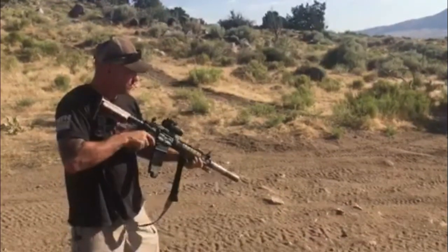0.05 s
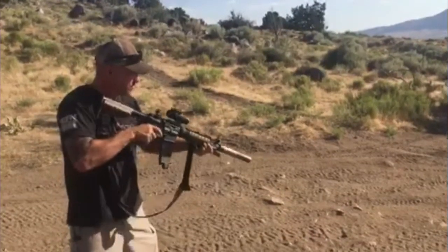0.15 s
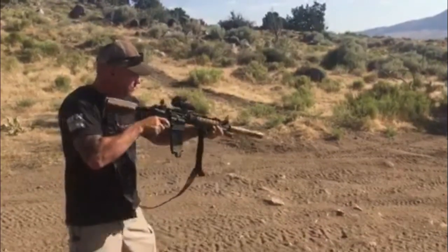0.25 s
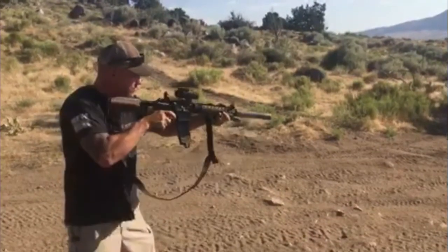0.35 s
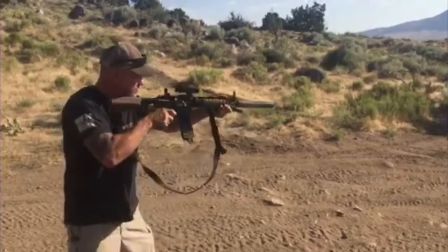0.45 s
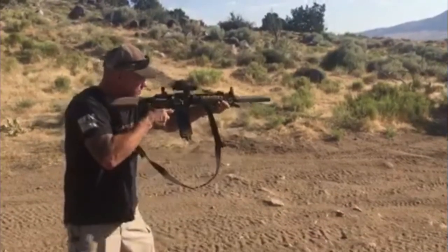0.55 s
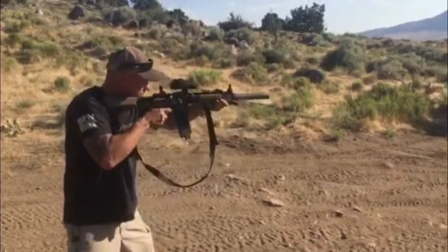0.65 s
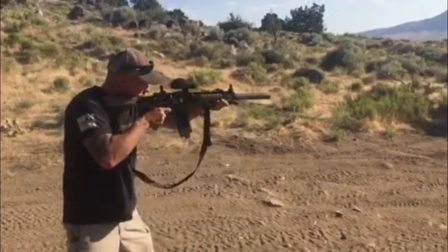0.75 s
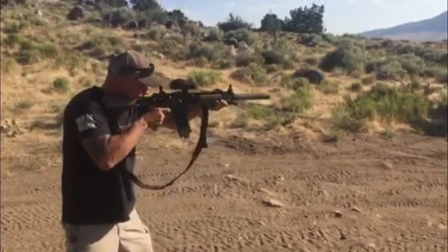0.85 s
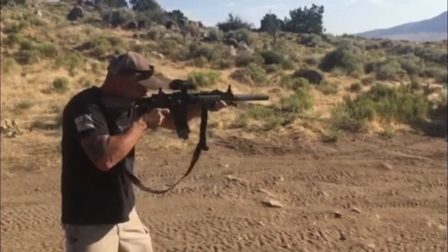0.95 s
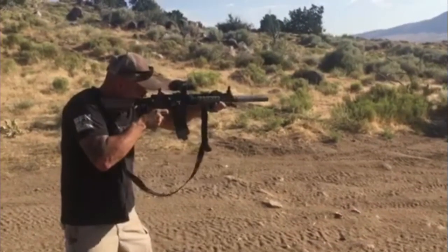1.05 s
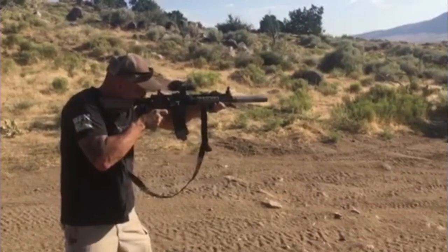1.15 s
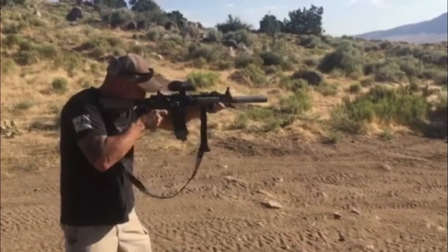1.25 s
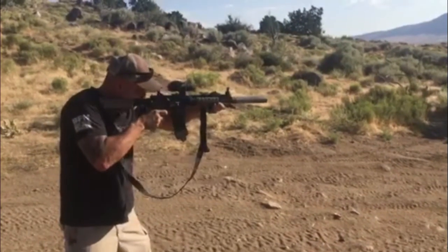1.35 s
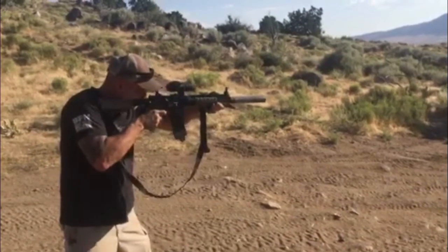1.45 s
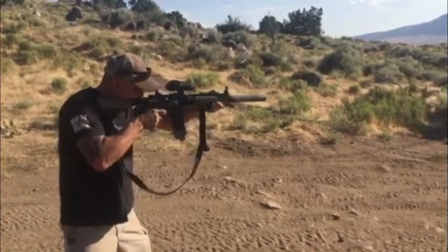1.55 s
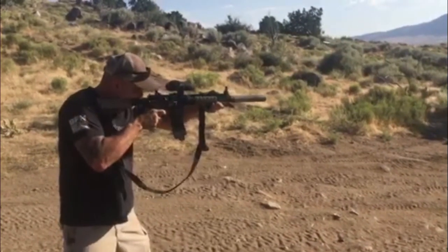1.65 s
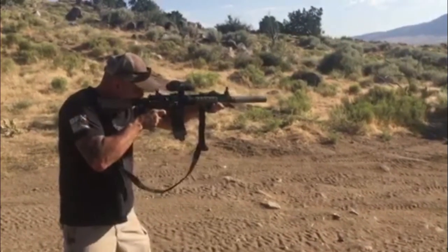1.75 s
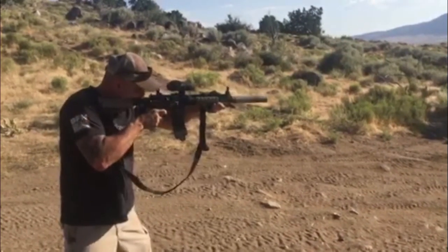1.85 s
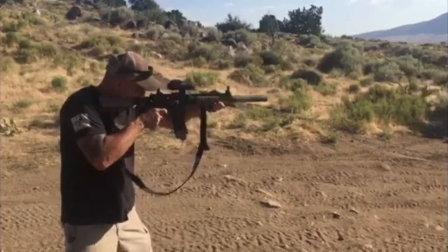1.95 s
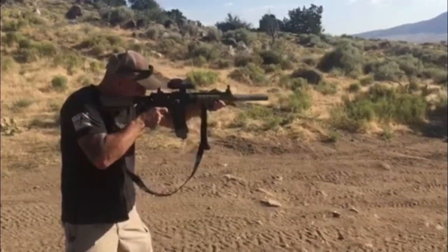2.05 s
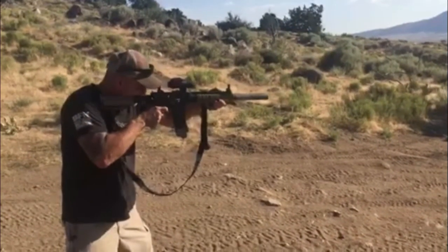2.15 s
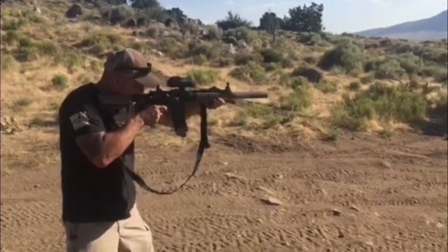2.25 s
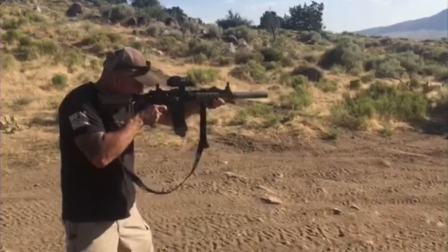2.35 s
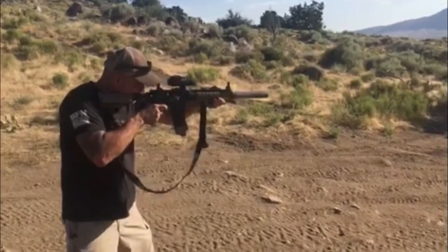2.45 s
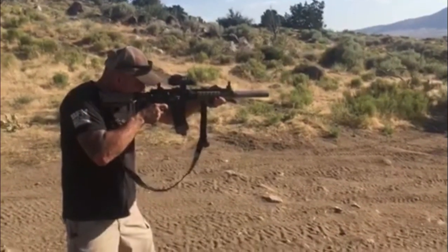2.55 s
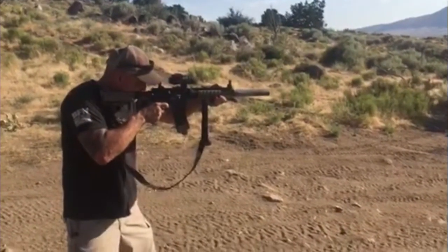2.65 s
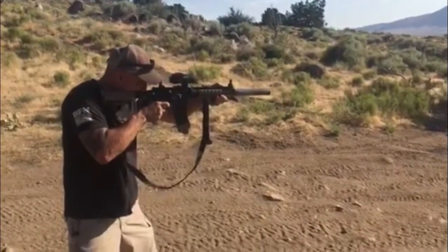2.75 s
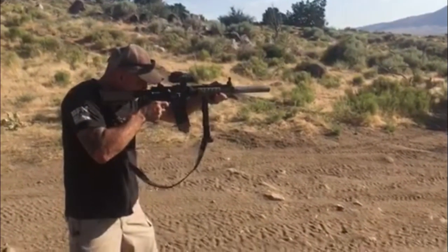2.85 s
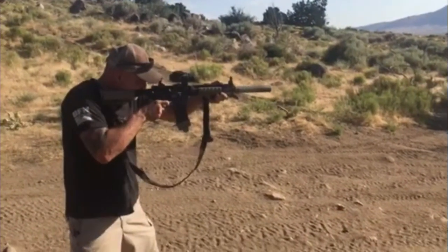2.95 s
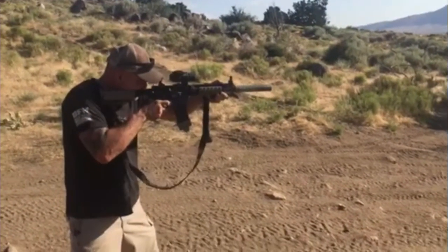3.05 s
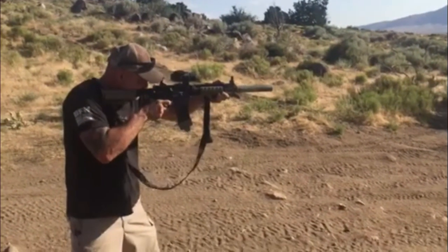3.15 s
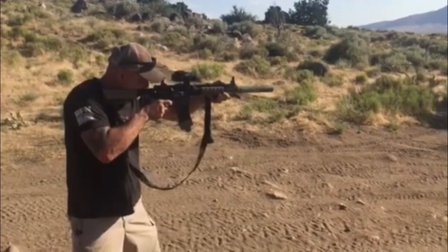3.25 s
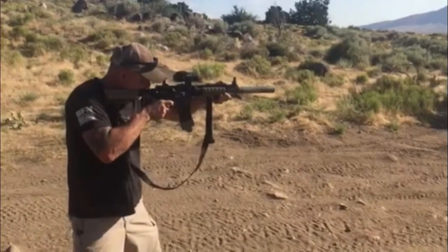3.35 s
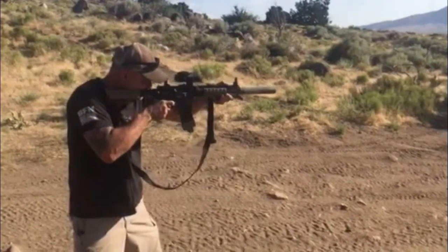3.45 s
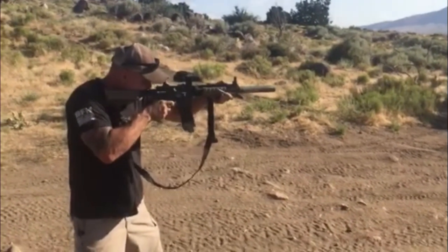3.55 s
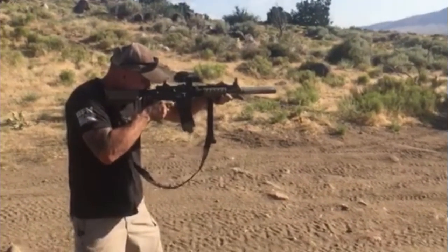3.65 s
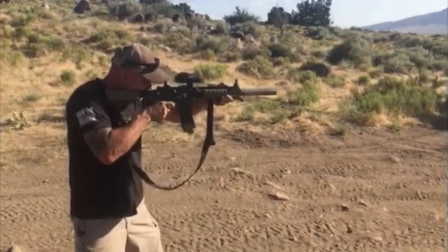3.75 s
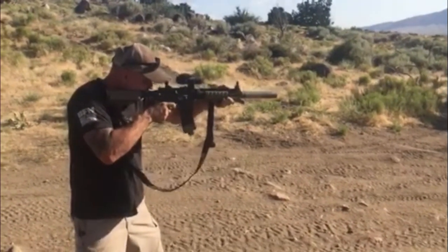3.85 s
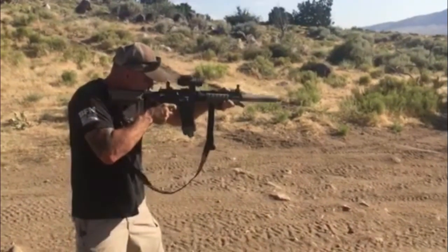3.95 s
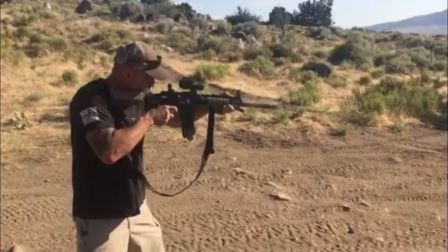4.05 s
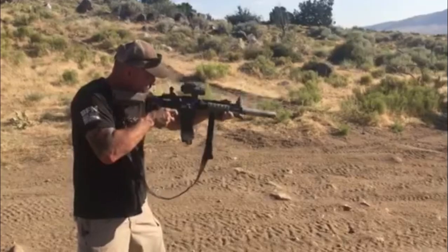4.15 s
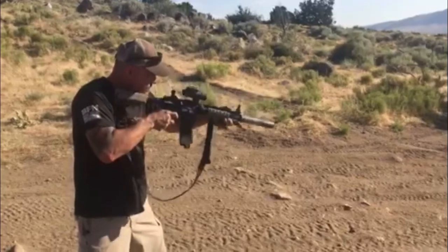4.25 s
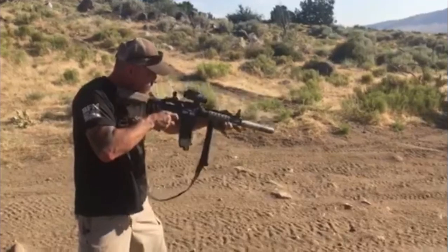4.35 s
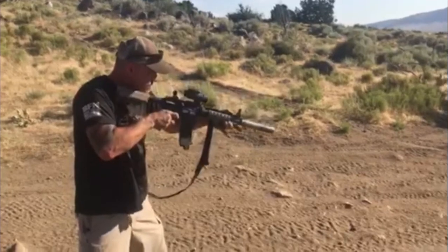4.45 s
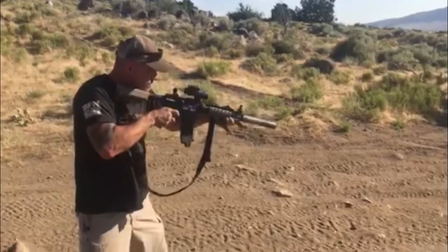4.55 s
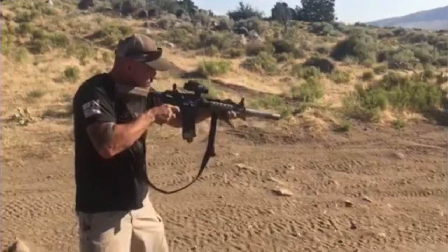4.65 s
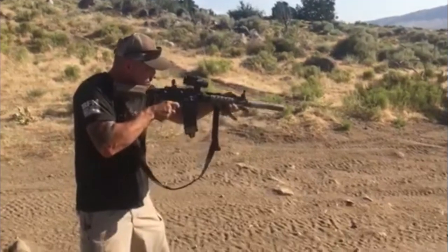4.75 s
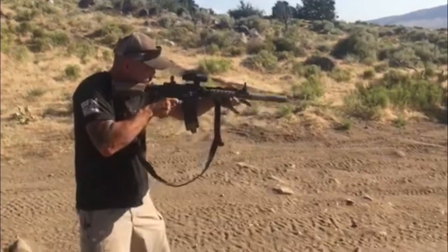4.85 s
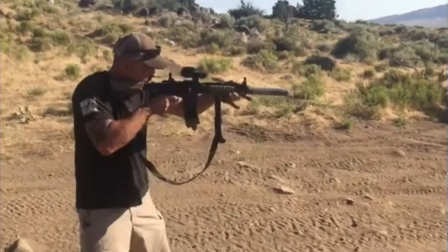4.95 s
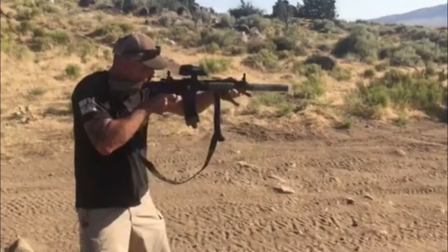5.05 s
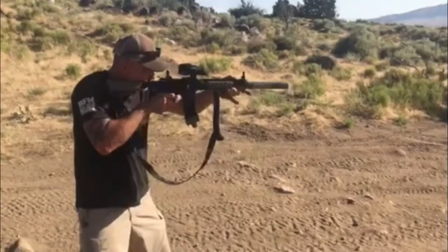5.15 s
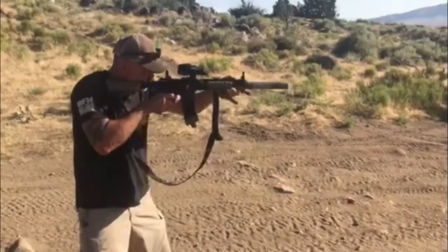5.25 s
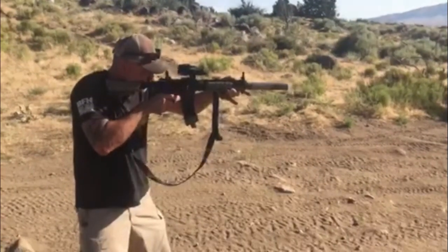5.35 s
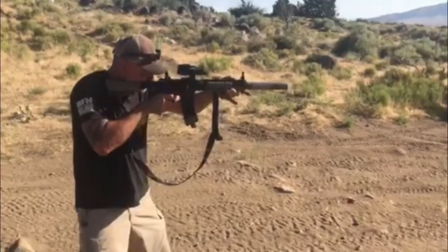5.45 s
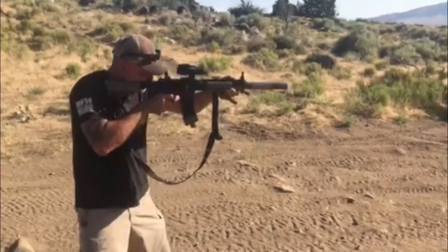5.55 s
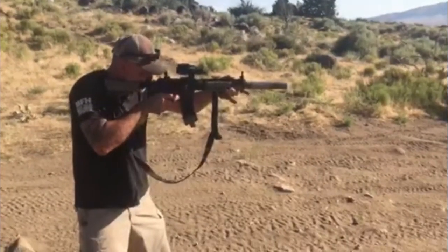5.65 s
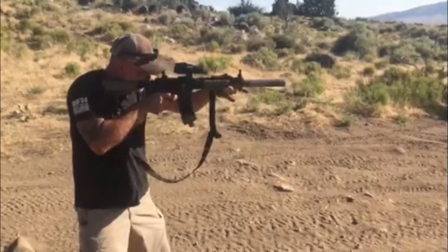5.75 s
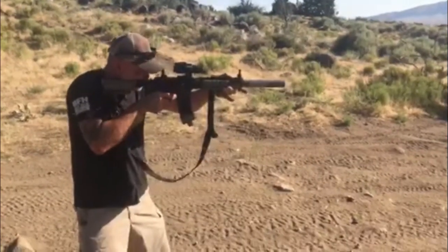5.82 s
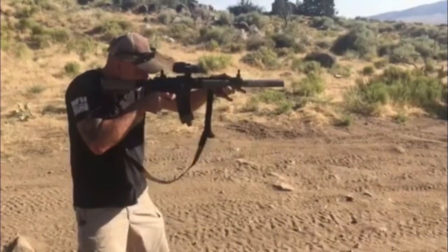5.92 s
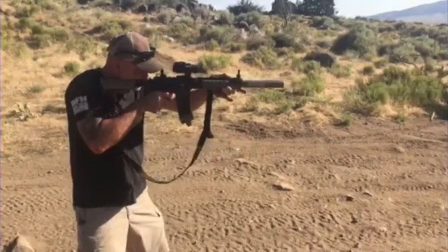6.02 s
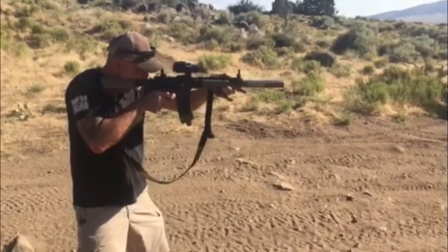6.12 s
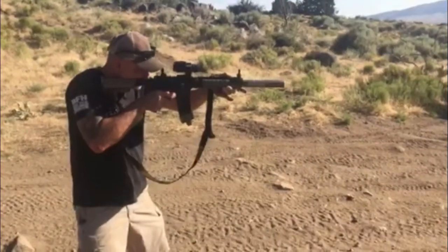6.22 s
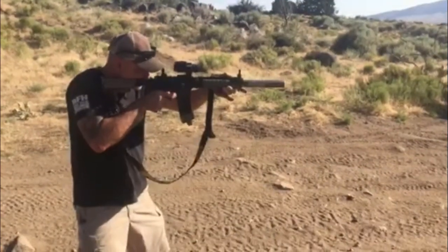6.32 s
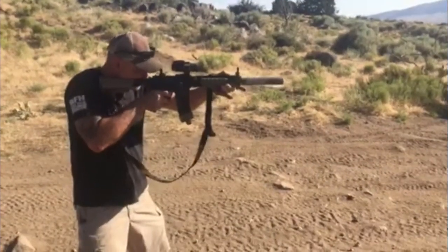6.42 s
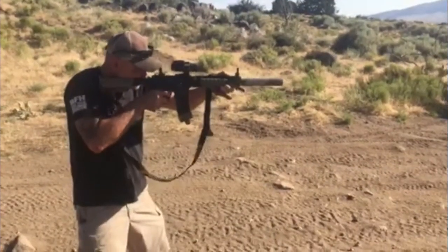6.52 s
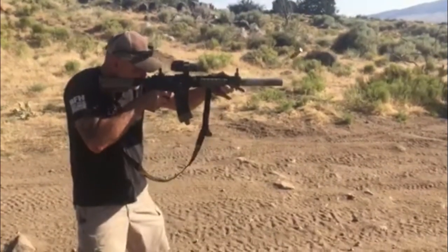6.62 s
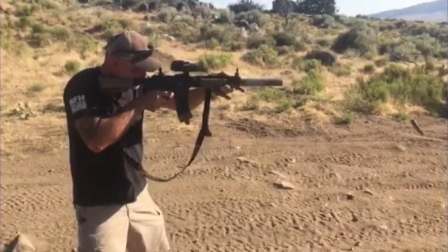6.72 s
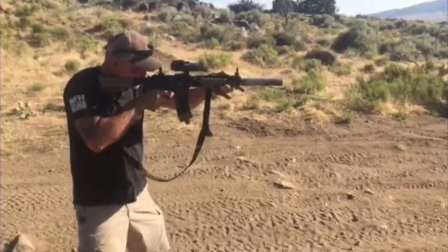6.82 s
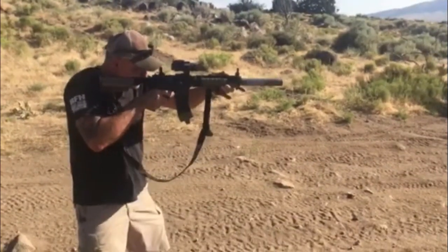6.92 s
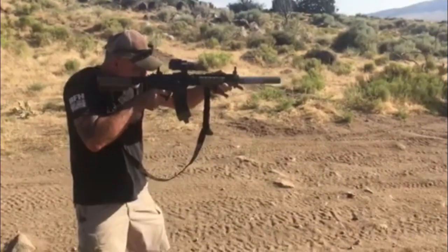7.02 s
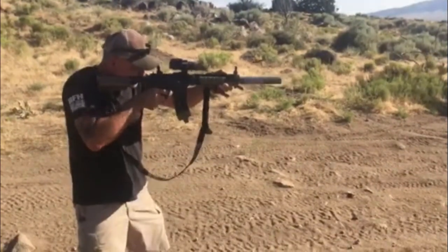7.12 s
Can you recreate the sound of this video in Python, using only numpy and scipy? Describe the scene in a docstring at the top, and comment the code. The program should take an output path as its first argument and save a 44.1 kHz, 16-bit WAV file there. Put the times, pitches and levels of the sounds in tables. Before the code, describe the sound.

A suppressed carbine cracks close to the microphone, clipping it, in two strings of single shots: four, a gap of about two seconds, then three. The bolt snaps shut with every shot, and a scrubby hillside throws back a short, grainy echo. A metal click comes before the firing, with lighter trigger and sling ticks later. Near the end a more distant gun adds one duller, rolling shot. The open air is otherwise nearly silent.

```python
"""On a dirt range, a suppressed carbine fires seven single shots a few metres from a phone that overloads.
Each shot is a brief swell, a blast of gas with a low thump, then the steel bolt slamming home.
Dirt banks, a scrubby hillside and rock faces throw the sound back. The safety, sling and trigger click,
spent brass rings, and another gun fires once further off, all over a faint hiss of open air."""
import sys
import numpy as np
from scipy import signal
from scipy.fft import rfft, irfft
from scipy.io import wavfile

SR = 44100
rng = np.random.default_rng(int(sys.argv[2]) if len(sys.argv) > 2 else 0)


def master(y):
    """Save y as 16-bit WAV."""
    cut = np.clip(np.atleast_2d(y).T, -1, 1)
    pcm = np.round(cut * 32767)  # scale
    wavfile.write(sys.argv[1], SR, pcm.astype(np.int16))


N = 316638
SHORT = np.arange(SR // 5) / SR  # 0.2 seconds of time, for quick sounds
LONG = np.arange(3 * SR // 2) / SR  # 1.5 seconds, for sounds that linger


def undb(db):
    """Turn decibels (dB) into a number to multiply by."""
    return 10 ** (np.asarray(db) / 20)


def add(out, s, x):
    """Mix the sound x into out, starting at s seconds."""
    i = int(s * SR)
    out[i:i + len(x)] += x[:max(N - i, 0)]


def fade(t, t60):
    """Die away smoothly, dropping 60 dB in t60 seconds."""
    return np.exp(-np.log(1000) * t / t60)


def bell(centre_s, spread_s):
    """A smooth rise and fall around centre_s."""
    return np.exp(-.5 * ((SHORT - centre_s) / spread_s) ** 2)


def wander(t, step):
    """A random level that glides to a new value every step seconds."""
    knots = np.arange(0, t[-1] + step, step)
    return np.interp(t, knots, rng.standard_normal(len(knots)))


def noise(t, tone):
    """Noise as long as t, of strength 1; the (Hz, dB) rows of tone say how strong each pitch is."""
    hz, db = np.transpose(tone)
    f = np.maximum(np.fft.rfftfreq(len(t), 1 / SR), 1)
    gain = undb(np.interp(np.log(f), np.log(hz), db))
    bass_cut = np.minimum(f / hz[0], 1) ** 2
    shaped = irfft(rfft(rng.standard_normal(len(t))) * gain * bass_cut, len(t))
    return shaped / shaped.std()


def resonate(x, hz, width_hz):
    """Keep the part of x near one pitch, so that it rings."""
    return signal.lfilter(*signal.iirpeak(hz, hz / width_hz, fs=SR), x)


def pitched_noise(hz, width_hz):
    """A short noise gathered around one pitch, of strength 1."""
    band = resonate(rng.standard_normal(len(SHORT)), hz, width_hz)
    return band / band.std()


# The tone of the open air. Each row: frequency in Hz, relative level in dB.
AIR_TONE = [(30, -21.5), (50, -7), (82, -1), (180, -10.5), (250, -12), (460, -18.5), (620, -17.5),
            (1400, -17), (1700, -17), (3300, -21.5), (9300, -30.5), (16000, -37.5)]


def still_air(db=-68.5, waver_db=-2.4):
    """Faint open-air hiss and rumble, wavering slowly."""
    t = np.arange(N) / SR
    waver = wander(t, .25)
    return noise(t, AIR_TONE) * undb(db + waver_db * waver)


# The notes at which the gun's moving parts ring. Each row: pitch in Hz, width in Hz, level in dB.
STEEL_NOTES = [(1337.3, 350, -1.5), (1900, 320, 6.5), (2765, 600, -3), (5980, 740, 5), (6110, 940, -1.5),
               (6955, 410, -1.5), (8635, 1300, -12.5), (12100, 2100, -12)]


def steel(t60, ring_db, ring_t60, rise_s, raw_db, low_hz=800):
    """Steel parts chatter for a moment and ring; parts this small give off no bass."""
    contact = rng.standard_normal(len(SHORT))
    body = sum(undb(db) * resonate(contact, hz, width) for hz, width, db in STEEL_NOTES)
    body += undb(raw_db) * contact
    decay = fade(SHORT, t60) + undb(ring_db) * fade(SHORT, ring_t60)
    knock = body / body.std() * np.minimum(SHORT / rise_s, 1) * decay
    return signal.sosfilt(signal.butter(2, low_hz, "high", fs=SR, output="sos"), knock)


def click(db, contact_hz=19000, softening=0.38, tail_db=-35):
    """A small steel click, duller the lighter it is, with a faint dull tail off the ground."""
    top_hz = contact_hz * undb(softening * db)
    snap = steel(t60=0.026, ring_db=-32, ring_t60=0.16, rise_s=0.00019, raw_db=-13)
    snap = signal.sosfilt(signal.butter(1, top_hz, fs=SR, output="sos"), snap)
    tail = undb(tail_db) * pitched_noise(hz=1000, width_hz=700) * fade(SHORT, 0.23)
    return undb(db) * (snap + tail)


# Clicks from handling the gun. Each row: start in seconds, level in dB.
HANDLING_CLICKS = [(0.4136, -42), (0.3869, -15.5), (4.2823, -36.5), (5.9162, -30), (5.946, -36.5),
                   (6.0259, -27), (6.598, -31.5)]


def safety_and_sling():
    """The safety lever and the metal parts of the sling click."""
    out = np.zeros(N)
    for s, db in HANDLING_CLICKS:
        add(out, s, click(db))
    return out


# The seven shots. Each row: start in seconds, levels in dB of the blast, the gas push, the gulp and
# the thump, then seconds until the thump and seconds until the trigger resets.
CARBINE_SHOTS = [(1.5260, 12, 4, -13, -20, 0.0307, 0.15), (2.2380, 8.5, 2.5, -3.5, -2.5, 0.019, 0.13),
                 (2.8919, 6, .5, -8.5, -22, .0092, 0.1303), (3.5582, 7.5, -4.5, -9.5, -6, 0.0187, 0.1157),
                 (5.7721, 11, 5.5, -5.5, -1.5, .022, .139), (6.4248, 7, -2, -5, -8.5, 0.02, .130),
                 (7.0753, 5.5, -0.5, -7, -21, 0.019, .13)]


def carbine(full_blast_db=10.5, echo_follow=0.64, bolt_follow=.45, move_s=4.6, move_delay_s=0.0072):
    """Each shot blasts, thumps and echoes; the bolt closes and the trigger resets as the finger lets go."""
    out = np.zeros(N)
    strewn = boulders()  # every shot meets the same ones
    for s, blast_db, push_db, gulp_db, thump_db, thump_s, reset_s in CARBINE_SHOTS:
        swell = lead_in(ring_hz=2790 + 28 * s)  # the ring climbs a little as the firing goes on
        add(out, s - len(swell) / SR, swell)
        add(out, s, muzzle(blast_db, push_db, gulp_db))
        add(out, s + thump_s, undb(thump_db) * thump())
        excess_db = blast_db - full_blast_db  # a louder blast makes the echoes and the bolt louder
        echo_gain = undb(echo_follow * excess_db)
        add(out, s, echo_gain * dirt_banks())
        add(out, s, echo_gain * travel(brush()))
        # between the two groups of shots the position shifts, so the path to the rocks grows
        detour_s = move_delay_s * (s > move_s)
        add(out, s + detour_s, echo_gain * undb(0.44) * travel(rock_faces(strewn)))
        add(out, s, ground_roll())
        add(out, s + .0443, undb(bolt_follow * excess_db) * bolt())  # it takes the same time every shot
        add(out, s + reset_s, click(db=-29))
    return out


# The tone of the swell before each shot. Each row: frequency in Hz, relative level in dB.
SWELL_TONE = [(90, -8.5), (160, 1.5), (450, -0.5), (1000, -7), (2300, -9.5), (2800, -4), (3400, -17),
              (7000, -20), (16000, -28)]


def lead_in(ring_hz, lead_s=.024, end_db=-17, climb_db=17, ring_db=-4):
    """A brief ringing swell leads into each crack."""
    t = SHORT[SHORT < lead_s]
    rush = noise(SHORT, SWELL_TONE)[:len(t)]
    ring = undb(ring_db) * np.sin(2 * np.pi * ring_hz * t)
    return (rush + ring) * undb(end_db - climb_db * (1 - t / lead_s))


# The tones of the blast, the gas push and the gulp. Each row: frequency in Hz, relative level in dB.
BLAST_TONE = [(70, -9.5), (150, -4), (400, -11), (1000, -6), (1400, -3), (1900, 2), (3000, -4),
              (4800, -6.5), (6300, -4.5), (9800, -14.5), (13000, -10.5), (16000, -16)]
PUSH_TONE = [(80, -12), (300, -2.5), (600, 1), (1100, -1), (2000, -7.5), (4000, -23), (16000, -47)]
GULP_TONE = [(70, -7), (115, 1), (170, -5), (270, -5.5), (420, -16), (1000, -49)]


def muzzle(blast_db, push_db, gulp_db, blast_t60=0.077, push_s=.016, rise_s=0.0009):
    """A sharp blast dies away while the suppressor empties: a rough push of gas sinks to a low gulp."""
    blast = undb(blast_db) * noise(SHORT, BLAST_TONE) * fade(SHORT, blast_t60)
    push = undb(push_db) * noise(SHORT, PUSH_TONE) * np.exp(-(SHORT / push_s) ** 4)
    swell = bell(centre_s=.015, spread_s=0.005)
    gulp = noise(SHORT, GULP_TONE) * swell
    gulp *= undb(gulp_db) * np.sqrt(np.sum(swell ** 2) / np.sum(gulp ** 2))  # sets its energy exactly
    return (blast + push + gulp) * np.minimum(SHORT / rise_s, 1)


# The tone of the low roll. Each row: frequency in Hz, relative level in dB.
ROLL_TONE = [(60, -4.5), (200, 1), (600, -10.5), (2000, -46.5)]


def ground_roll(db=-30.0, t60=0.18):
    """The low part of the shot rolls away over the ground."""
    return undb(db) * noise(LONG, ROLL_TONE) * fade(LONG, t60)


def thump(hz=55, t60=0.075, low_hz=30):
    """The gas cloud collapses: a suction, then a few low swings of pressure."""
    swings = -np.sin(2 * np.pi * hz * SHORT) * fade(SHORT, t60)
    return signal.sosfilt(signal.butter(1, low_hz, "high", fs=SR, output="sos"), swings)


def bolt():
    """The steel bolt slams shut and sets the gun's parts ringing."""
    return undb(-7.5) * steel(t60=0.028, ring_db=-21.0, ring_t60=.07, rise_s=0.00032, raw_db=-21)


# The empty cases. Each row: start in seconds, level in dB.
SPENT_CASES = [(1.571, -55.5), (3.60, -57), (4.195, -53.5)]


def spent_brass(hz=15200, t60=.42, shimmer_db=4.0):
    """An empty brass case rings thinly and unevenly as it tumbles."""
    out = np.zeros(N)
    ring = np.sin(2 * np.pi * hz * LONG) * fade(LONG, t60)
    for s, db in SPENT_CASES:
        tumble = wander(LONG, .012)
        add(out, s, undb(db + shimmer_db * tumble) * ring)
    return out


# The tone of the echo off the dirt banks. Each row: frequency in Hz, relative level in dB.
BANK_TONE = [(100, -14), (500, -9.5), (1400, 3.5), (2200, -2), (4000, 5), (6500, -4.5), (8500, -15),
             (16000, -19)]


def dirt_banks(delay_s=.075, wash_t60=0.173):
    """The nearest dirt banks return a bright, smeared slap with a short wash and a hollow knock."""
    slap = undb(-27) * bell(delay_s, spread_s=0.003)
    wash = undb(-29) * np.minimum(SHORT / delay_s, 1) * fade(np.maximum(SHORT - delay_s, 0), wash_t60)
    bright = noise(SHORT, BANK_TONE) * (slap + wash)
    knock = undb(-38) * pitched_noise(hz=590, width_hz=64) * bell(centre_s=0.0956, spread_s=0.0042)
    return bright + knock


# Brushy ground that scatters the shot: range floor, hillside, ridge and the country beyond. Each row:
# delay of the peak in seconds, level in dB, seconds to build up by 60 dB, seconds to fade by 60 dB.
BRUSHY_SLOPES = [(0.056, -29.5, 0.33, 0.35), (.232, -39, 0.23, 0.75), (.705, -41.5, 0.78, .45),
                 (0.37, -53.5, 0.03, 2.9)]


def terrain(delay):
    """How strong the echo is at each delay: every slope builds up to its peak and dies away."""
    power = 0
    for peak_s, db, build_s, t60 in BRUSHY_SLOPES:
        build = fade(np.maximum(peak_s - delay, 0), build_s)
        decay = fade(np.maximum(delay - peak_s, 0), t60)
        power += (undb(db) * build * decay) ** 2
    return np.sqrt(power)


# The tone of the echo off the brush. Each row: frequency in Hz, relative level in dB.
BRUSH_TONE = [(70, -11), (150, -3.5), (280, -6), (450, -14.5), (750, -9), (1100, -1.5), (1700, 4.5),
              (2500, -0.5), (3600, 7), (5000, -0.5), (7000, -4), (10000, -9.5), (16000, -11.5)]


def brush(grain_db=3.5):
    """Many small things on the hillside each send a little back, blurring into one grainy echo."""
    patches = wander(LONG, .005)
    return noise(LONG, BRUSH_TONE) * terrain(LONG) * undb(grain_db * patches)


def travel(echo, air_db_per_s=38, air_hz=6000, ground_db=11, ground_hz=470):
    """The later an echo, the more air has soaked up its treble and soft ground cancelled its low mids."""
    f, t, frames = signal.stft(echo, SR, nperseg=512)
    f = np.maximum(f, 1)[:, None]
    air_loss = air_db_per_s * t * (f / air_hz) ** 2
    ground_loss = ground_db * np.minimum(t / 0.2, 1) * np.exp(-2 * np.log2(f / ground_hz) ** 2)
    return signal.istft(frames * undb(-air_loss - ground_loss), SR)[1][:len(echo)]


# The large rock faces on the hillside. Each row: echo delay in seconds, level in dB.
ROCK_ECHOES = [(.2148, -26.5), (.223, -30), (.2544, -25.5), (.268, -35), (.375, -37), (.432, -40.5)]
# The tone of an echo off rock. Each row: frequency in Hz, relative level in dB.
ROCK_TONE = [(150, -13), (600, -18.5), (1100, -5), (1700, 6), (2400, -5), (3600, -5), (5000, -10),
             (8000, -14), (16000, -21)]


def rock_faces(boulder_echoes, rise_s=0.0022):
    """Each distant rock face or boulder returns one short slap with a hollow pitch."""
    out = np.zeros(N)
    for s, db in ROCK_ECHOES + boulder_echoes:
        hollow = undb(-2) * pitched_noise(hz=1680, width_hz=300) * fade(SHORT, 0.025)
        slap = undb(-3.5) * noise(SHORT, ROCK_TONE) * fade(SHORT, 0.04)
        add(out, s, undb(db) * (slap + hollow) * np.minimum(SHORT / rise_s, 1))
    return out[:len(LONG)]


def boulders(count=16, near_s=.29, far_s=.8, over_brush_db=5.5, spread_db=3):
    """Boulders lie at random over the slopes. Each row: echo delay in seconds, level in dB."""
    place, size = rng.uniform(size=(count, 2)).T
    delay = near_s + (far_s - near_s) * (np.arange(count) + place) / count
    db = 20 * np.log10(terrain(delay)) + over_brush_db + spread_db * (2 * size - 1)
    return list(zip(delay, db))


# The tones of the far gun's crack and its long roll. Each row: frequency in Hz, relative level in dB.
FAR_CRACK_TONE = [(70, -12), (180, 26), (300, 6), (480, -17), (1100, 19), (1800, 15), (3000, -1),
                  (7000, -11.5), (16000, -58)]
FAR_ROLL_TONE = [(40, -41), (100, 2), (160, 11.5), (250, -7), (400, -21), (700, 1.5), (1100, 5), (2000, 0),
                 (4000, -16.5), (8000, -41), (16000, -62)]


def far_gun(s=6.6611, bounce_s=0.00289, boom_hz=170, grain_db=5.5, air_hz=5500):
    """A shot further along the range: crack, ground bounce, boom and a long, lumpy roll off the hills."""
    out = np.zeros(N)
    crack = undb(-10.5) * noise(SHORT, FAR_CRACK_TONE) * fade(SHORT, 0.038)
    bounce = undb(-16.5) * noise(SHORT, FAR_CRACK_TONE) * fade(SHORT, 0.04)
    boom = undb(-14.5) * np.sin(2 * np.pi * boom_hz * SHORT) * fade(SHORT, 0.032)
    lumps = undb(grain_db * wander(LONG, .008))
    decay = undb(-37.0) * fade(LONG, 0.43) + undb(-47.0) * fade(LONG, 7.6)
    add(out, s, crack)
    add(out, s + bounce_s, bounce + boom)
    add(out, s, noise(LONG, FAR_ROLL_TONE) * lumps * decay)
    # the long path takes off the treble, and the boom has no deep bass
    return signal.sosfilt(signal.butter(2, [45, air_hz], "band", fs=SR, output="sos"), out)


def scene():
    """All the sounds meet at one microphone."""
    return (carbine() + safety_and_sling() + spent_brass() + far_gun() + still_air())[None]


def record(dry, top_hz=16000):
    """The phone overloads, flattening the peaks of the blasts, and cuts the highest treble."""
    clipped = np.clip(dry, -1, 1)
    return signal.sosfilt(signal.ellip(8, .2, 70, top_hz, fs=SR, output="sos"), clipped)


dry = scene()
out = record(dry)
master(out)
```